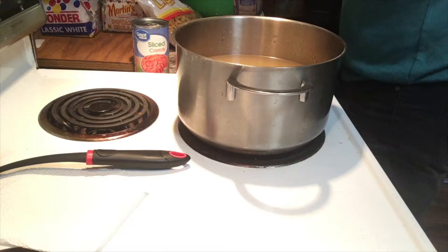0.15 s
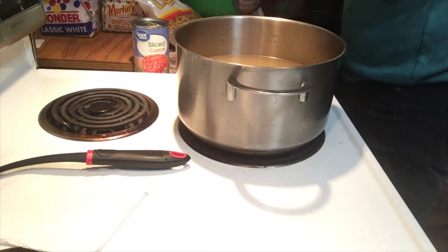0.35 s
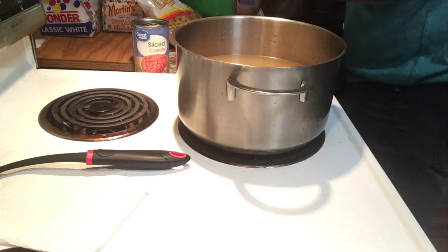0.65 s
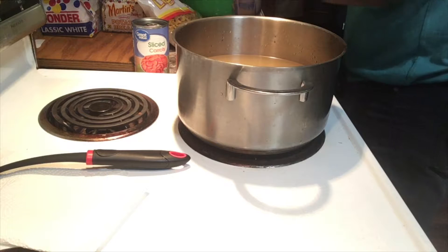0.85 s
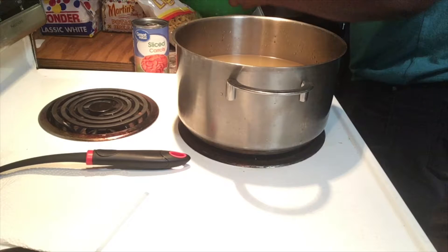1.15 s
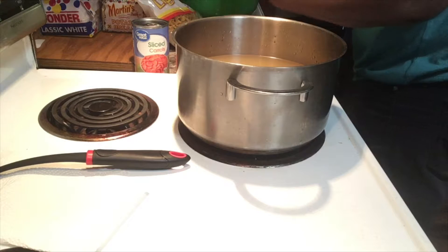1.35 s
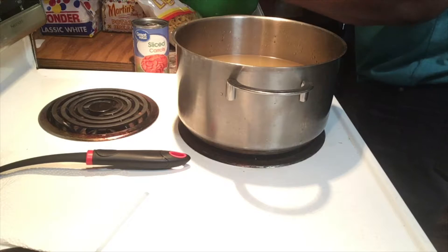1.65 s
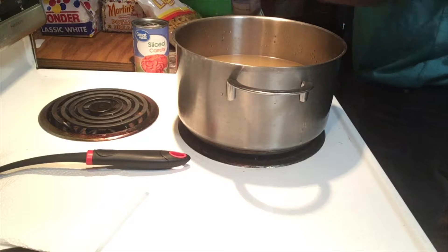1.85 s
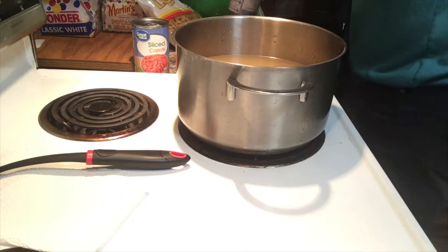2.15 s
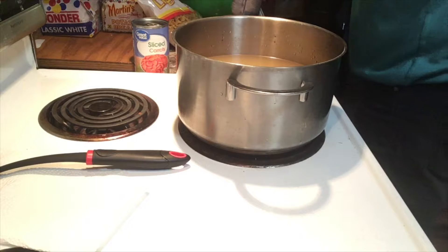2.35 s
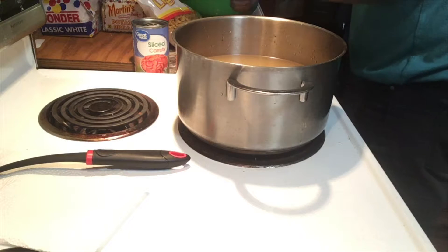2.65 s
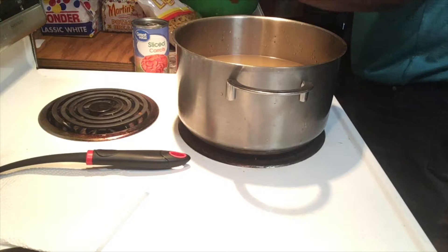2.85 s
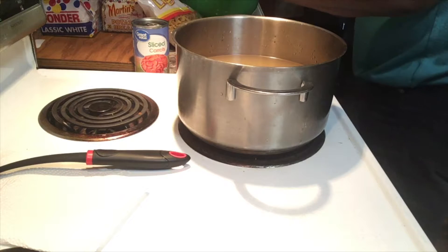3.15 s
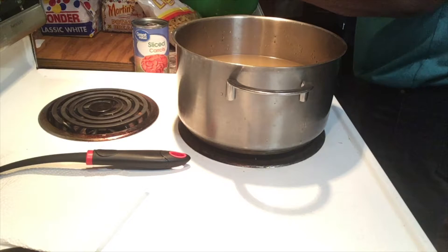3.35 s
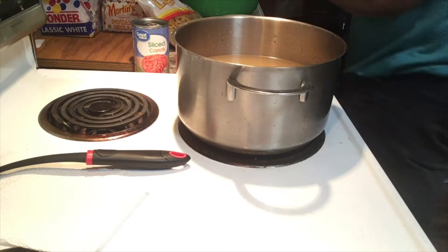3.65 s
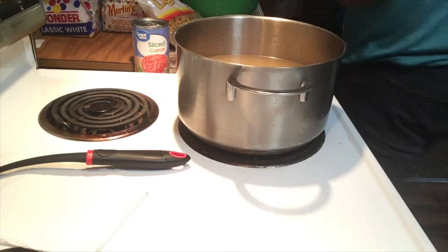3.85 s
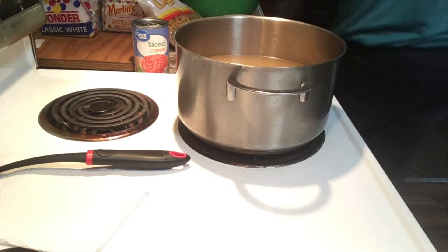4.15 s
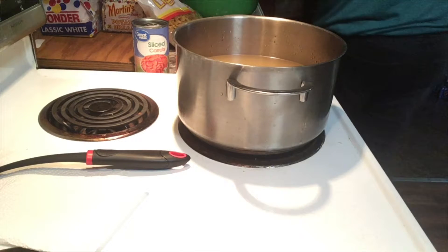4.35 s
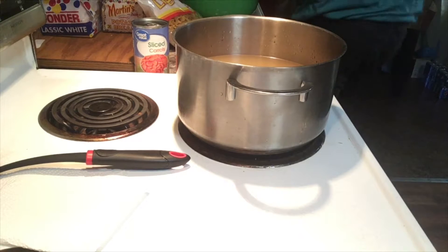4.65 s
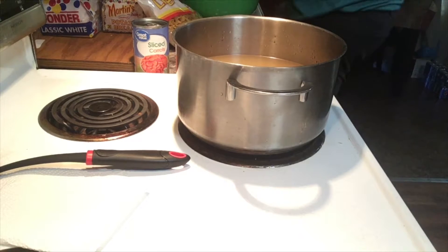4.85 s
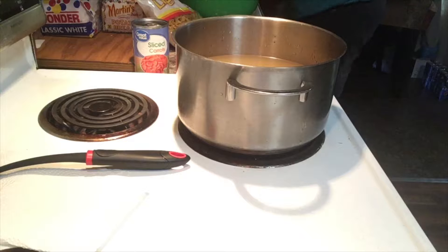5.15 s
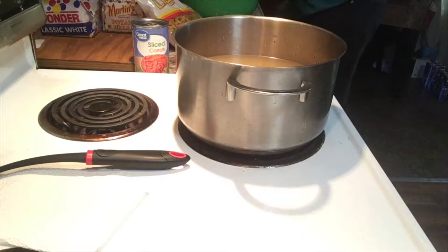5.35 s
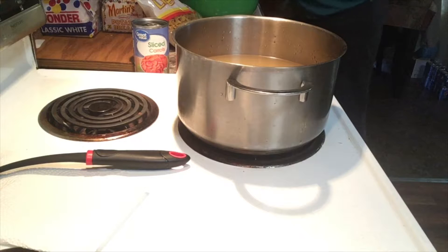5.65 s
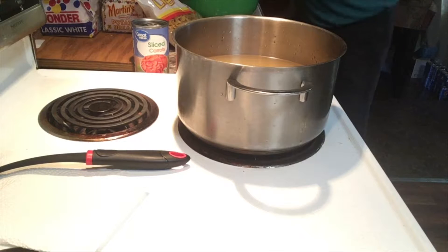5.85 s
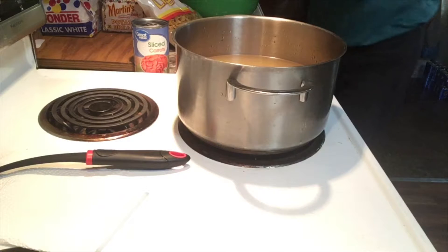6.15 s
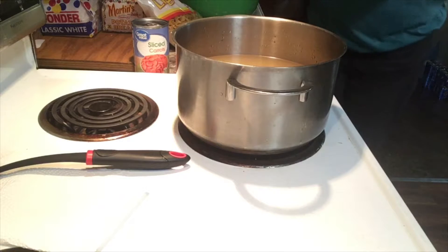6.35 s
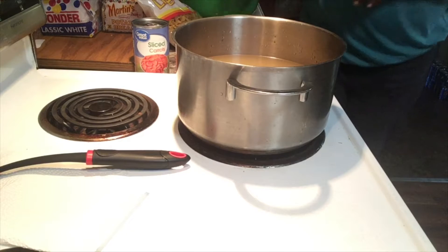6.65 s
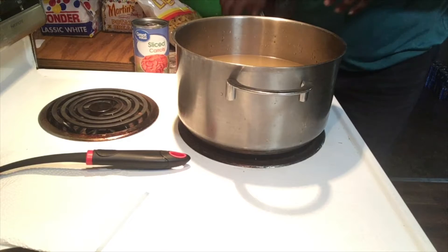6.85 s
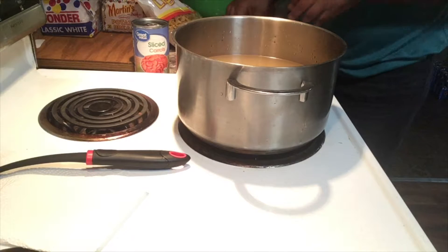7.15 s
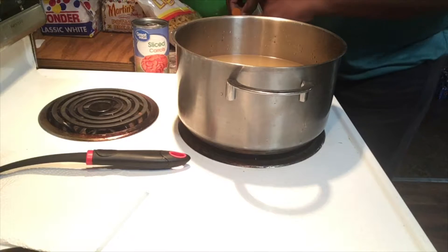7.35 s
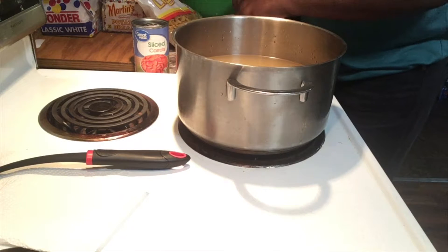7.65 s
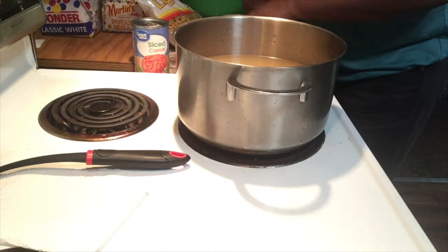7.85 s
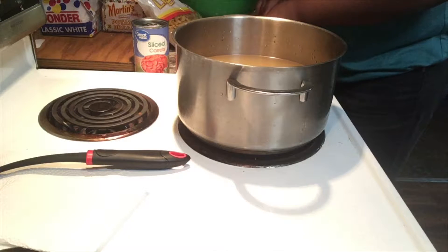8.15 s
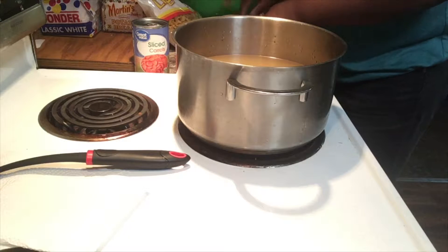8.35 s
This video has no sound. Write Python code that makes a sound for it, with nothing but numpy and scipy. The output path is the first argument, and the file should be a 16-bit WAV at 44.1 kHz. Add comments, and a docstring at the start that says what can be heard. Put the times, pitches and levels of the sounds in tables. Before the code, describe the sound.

A quiet small kitchen with low room rumble, faint hum and short echo. From 0 to 1.3 seconds a hand can opener gives faint, irregular metallic ticks, with barely audible footfalls. At 1.4 a sharp snap of the rim, then more sparse ticks until about 3.1. At 3.55 a dull wooden knock, followed from 3.7 to 3.9 by quick bright cracks and a ringing lid. Loud hollow tin clanks come at 4.03 and 4.2, with smaller rattles, choked as a hand grips the can around 4.4. At 4.6 a solid wooden knock with a heavy footfall and cloth brushing. Around 5.75 the can tumbles into a bin: boomy thuds, then tins clattering and plastic crinkling until 6.3. Soft steps and light knocks at 6.55 and 7.15, isolated ticks near 6.5 to 6.75, faint squeaks at 7 and 8, and very quiet ticks to the end at 8.5.

```python
"""A hand can opener ticks round a tin can: each slipping gear tooth kicks damped modes and a noise burst.
The cutter snaps through the rim as decaying noise and a ringing lid; the can's end plate and wall clank
as sums of modes. A bin and its tins answer with dull thuds, clatter and a crinkling bag. Footfalls, knocks
and clothes are coloured noise, the crank squeaks as a few swelling partials, and a small kitchen adds
a short echo over faint hum and room noise."""
import sys
import numpy as np
from scipy import signal
from scipy.fft import rfft, irfft, next_fast_len
from scipy.io import wavfile
from scipy.ndimage import map_coordinates

SR = 44100
rng = np.random.default_rng(int(sys.argv[2]) if len(sys.argv) > 2 else 0)


def store_pcm(level_fs):
    """Save levels as 16-bit WAV."""
    pcm = np.round(np.clip(level_fs, -1, 1) * 32767).astype(np.int16)
    wavfile.write(sys.argv[1], SR, np.atleast_2d(pcm).T)


N = 374850
AGE = np.arange(SR * 3 // 4) / SR  # time since a blow [s]
FIRST = SR // 40  # 25 ms [samples]

# "Nominal" levels and decay times are trimmed or scaled where the sound is played.
# Levels of blows refer to the rms of their first 25 ms.


def amp(db):
    """Logarithmic level: decibels to linear gain."""
    return 10 ** (np.asarray(db) / 20)


def unit(x):
    """Normalisation by mean power: scale to rms 1."""
    return x / np.sqrt(np.mean(x ** 2) + 1e-20)


def struck(x):
    """Normalisation by onset power: the first 25 ms of a blow get rms 1."""
    return x / np.sqrt(np.mean(x[:FIRST] ** 2) + 1e-20)


def along(points, hz):
    """Logarithmic frequency scale: interpolate (frequency, value) points on it."""
    f, v = np.transpose(points)
    return np.interp(np.log(hz + 1), np.log(np.sort(f) + 1), v)


def fade(t60, t=AGE):
    """Exponential decay: amplitude falls 60 dB in t60 seconds."""
    return np.exp(-np.log(1000) * t / np.maximum(t60, 1e-3))


def wobble(rate, size):
    """Band-limited fluctuation: a smooth random curve with rate knots a second."""
    knots = rng.standard_normal(int(size * rate / SR) + 4)
    smooth = map_coordinates(knots, [np.arange(8 * len(knots)) / 8], mode="nearest")
    return np.interp(np.arange(size) * 8 * rate / SR, np.arange(len(smooth)), smooth)


def colour(x, points):
    """Minimum-phase filtering: the folded cepstrum makes the given response causal."""
    size = 2 * next_fast_len(len(x) // 2 + 4096)
    level_db = along(points, np.fft.rfftfreq(size, 1 / SR))
    cepstrum = irfft(np.log(amp(level_db) + 1e-6))
    cepstrum[1:size // 2] *= 2
    cepstrum[size // 2 + 1:] = 0
    response = np.exp(rfft(cepstrum))
    return irfft(rfft(x, size) * response)[:len(x)]


def add(track, s, sound):
    """Superposition: mix a sound in at time s."""
    start = max(round(s * SR), 0)
    track[start:start + len(sound)] += sound[:max(N - start, 0)]


def crowd(size, ripple_db):
    """High modal density: noise with random spectral ripple, knots 60 Hz apart, deeper in the treble."""
    hz = np.fft.rfftfreq(size, 1 / SR)
    knots = np.arange(0, SR, 60)
    ripple = np.interp(hz, knots, rng.standard_normal(len(knots)))
    depth = ripple_db * hz / (hz + 3000)
    return irfft(rfft(rng.standard_normal(size)) * amp(depth * ripple), size)


def burst(spectrum, t60, crack, rise=0.00144):
    """Impact excitation: a sharp crack over a crowd of quickly dying resonances."""
    shape = (fade(t60) + crack * fade(0.0059)) * (1 - fade(rise))
    grain = crowd(len(AGE), ripple_db=7)
    return struck(colour(grain * shape, spectrum))


def ring(modes, length, waver, buzz, pitch=1):
    """Modal superposition: damped sines, their phase blurred by grip and roughened by loose contact."""
    out = np.zeros(len(AGE))
    for k, (hz, db, t60) in enumerate(modes):
        strength = (-1) ** k * amp(db + rng.uniform(-1.5, 1.5))
        blur = waver * np.sqrt(hz / 1000) * wobble(70, size=len(AGE))
        phase = 2 * np.pi * hz * pitch * AGE + blur
        rough = 1 + buzz * np.sqrt(hz / 2000) * wobble(350, size=len(AGE))
        out += strength * fade(t60 * length) * rough * np.sin(phase)
    return struck(out * (1 - fade(.004)))


def stroke(s, length, rise, t60):
    """Gesture envelope: a linear rise from time s, a hold until s + length, exponential decay."""
    t = np.arange(N) / SR - s
    return np.clip(t / rise, 0, 1) * fade(t60, np.maximum(t - length, 0))


def rustle(spectrum, grain_db, rate):
    """Friction noise: random level swings gather it into small clumps."""
    clumps = amp(grain_db * wobble(rate, size=N))
    return unit(colour(rng.standard_normal(N) * clumps, spectrum))


def chatter(spectrum, rate, t60):
    """Random micro-impacts: contacts of uneven size, on average rate a second."""
    hits = (rng.random(N) < rate / SR) * rng.uniform(0.2, 1, N)
    shape = signal.fftconvolve(hits, fade(t60))[:N]
    grain = crowd(N, ripple_db=7)
    return unit(colour(grain * shape, spectrum))


# Room noise spectrum: (frequency [Hz], relative level [dB])
AIR_SPECTRUM = [(25, -12), (45, 0.5), (75, -6), (115, -9), (160, -12.5), (300, -21.5), (600, -24),
                (1150, -25.5), (1900, -32), (3000, -33), (4800, -38.5), (7700, -38.5), (12000, -43.5),
                (15800, -47)]
# Appliance hum partials: (frequency [Hz], level [dB])
HUM_PARTIALS = [(120, -72.5), (1125, -81), (1243, -87)]
AIR_DB = -61.5


def background():
    """Stationary noise and phase-modulated tones: room rumble, hiss and a faintly unsteady hum."""
    t = np.arange(N) / SR
    hum = np.zeros(N)
    for hz, db in HUM_PARTIALS:
        hum += amp(db) * unit(np.sin(2 * np.pi * hz * t + 0.42 * wobble(11, size=N)))
    return hum + amp(AIR_DB) * rustle(AIR_SPECTRUM, grain_db=0.9, rate=9.0)


# Opener ticks, mostly the gear slipping a tooth, the one at 5.3 s a rattle in the hand: (time [s], nominal
# level [dB])
OPENER_TICKS = [(0.0714, -54), (0.2357, -53.5), (0.404, -51.5), (0.554, -54), (0.8221, -55), (1.863, -51),
                (1.952, -59.5), (2.129, -51.5), (2.262, -53.5), (2.7199, -47.5), (3.0952, -51),
                (5.3012, -55), (6.4998, -50), (6.7131, -52), (6.754, -48.5), (7.453, -58), (7.723, -62.5),
                (8.0581, -60.5), (8.4007, -58.5)]
# Spells of handling, the grip setting the brightness: (start [s], end [s], nominal edge re tick [dB])
HANDLING_SPELLS = [(0, 1.3, -17), (1.6, 3.302, -13), (5.2, 6.802, -14), (7.391, 8.504, -6.5)]
# Faint teeth that mesh in between: rate [1/s], nominal level [dB], half-range about it [dB]
FAINT_TICKS_PER_S, FAINT_TICK_DB, FAINT_SPREAD_DB = 2.3, -63, 5.5


def tick_schedule():
    """Intermittent meshing: listed ticks and random faint teeth, as (time, level, edge)."""
    ticks = []
    for start, end, edge_db in HANDLING_SPELLS:
        ticks += [(s, db, edge_db) for s, db in OPENER_TICKS if start <= s < end]
        for when, size in rng.random((int((end - start) * FAINT_TICKS_PER_S), 2)):
            level_db = FAINT_TICK_DB + FAINT_SPREAD_DB * (2 * size - 1)
            ticks.append((start + when * (end - start), level_db, edge_db))
    return ticks


# Gear modes: (frequency [Hz], mean relative level [dB], t60 [s])
GEAR_MODES = [(1017, -0.5, 0.057), (1190, -7.5, .05), (1574, -3, 0.061), (1690, -10.5, 0.045),
              (2060, -5.5, 0.058), (2320, -21, 0.034), (2390, -2.5, 0.066), (2510, 1.5, 0.057),
              (2760, -8, 0.045), (3310, -8, 0.036)]
# Bright contact spectrum of cutter and gear: (frequency [Hz], relative level [dB])
CUTTING_SPECTRUM = [(200, -26.5), (450, 8), (1000, 3.5), (1800, 1.5), (2400, 0.5), (3400, -1.5), (4500, -4),
                    (7000, -0.5), (9500, -6.5), (12500, -3.5), (15500, -16)]


def gear_ticks():
    """Impulsive modal excitation: each tooth rings the gear and adds a bright noise edge."""
    out = np.zeros(N)
    for s, db, edge_db in tick_schedule():
        add(out, s, amp(db - 10) * ring(GEAR_MODES, length=1.0, waver=0.98, buzz=0.54))
        edge = burst(CUTTING_SPECTRUM, t60=0.079, crack=0.6, rise=0.0056)
        add(out, s, amp(db + edge_db - 4.5) * edge)
    return out


# Footfalls: (heel time [s], nominal level [dB])
FOOTFALLS = [(0.076, -53), (0.19, -53.5), (0.575, -49), (3.561, -45.5), (4.405, -44.5), (4.474, -41.5),
             (4.618, -30.5), (4.99, -50), (5.09, -47), (5.18, -53), (5.271, -55.5), (6.55, -38.5),
             (7.143, -37.5), (7.19, -36.5), (7.674, -52.5)]
# Floorboard spectrum: (frequency [Hz], relative level [dB])
FLOOR_SPECTRUM = [(30, -30), (60, -4.5), (85, -10), (125, 6), (155, -1.5), (210, -13.5), (350, -23),
                  (900, -61)]
HEEL_DB, HEEL_T60_S = -1.5, 0.1  # re nominal level
SOLE_DB, SOLE_T60_S, SOLE_LAG_S = -5.0, 0.13, 0.0261  # the sole comes down after the heel


def footsteps():
    """Soft impact: heel then sole excite the floor with gradual, low-pitched noise bursts."""
    out = np.zeros(N)
    for s, db in FOOTFALLS:
        heel = burst(FLOOR_SPECTRUM, HEEL_T60_S, crack=0, rise=0.014)
        sole = burst(FLOOR_SPECTRUM, SOLE_T60_S, crack=0, rise=0.017)
        add(out, s, amp(db + HEEL_DB) * heel)
        add(out, s + SOLE_LAG_S, amp(db + SOLE_DB) * sole)
    return out


# Knocks on counter and cupboard: (time [s], nominal level [dB], t60 [s])
WOOD_KNOCKS = [(0.196, -63, 0.12), (0.604, -64, 0.12), (3.550, -33, 0.18), (3.577, -40.5, 0.091),
               (4.616, -27, 0.13), (4.718, -54.5, 0.13), (5.069, -57, .3), (6.548, -59, 0.089),
               (6.804, -46.5, 0.22), (7.140, -48, 0.16), (7.203, -50.5, 0.13)]
# Wood spectrum: (frequency [Hz], relative level [dB])
WOOD_SPECTRUM = [(41, -35), (70, -21.5), (100, -8.5), (136, -2), (242, -16), (309, -5), (461, -13.5),
                 (562, -6.5), (937, -12.5), (1340, -18), (2270, -28.5), (2600, -33), (2900, -32.5),
                 (14000, -64)]


def knocks():
    """Heavily damped impact: wood answers with short, dull bursts."""
    out = np.zeros(N)
    for s, db, t60 in WOOD_KNOCKS:
        add(out, s, amp(db - 1.0) * burst(WOOD_SPECTRUM, t60, crack=0.46, rise=.005))
    return out


GRIP_S, GRIP_T60_S = 4.365, .45  # the hand closes on the can


def grip():
    """Added damping: a gain that is 1 until the hand closes, then decays."""
    return fade(GRIP_T60_S, np.maximum(np.arange(N) / SR - GRIP_S, 0))


# Can end popping in and out: (time [s], level before grip [dB], pitch [Hz], nominal t60 [s])
END_FLEXES = [(0.44, -69, 440, 0.3), (1.552, -58, 441, .25), (2.165, -56, 438.6, 0.37),
              (3.695, -46.5, 444, 0.78), (3.79, -46, 430, 0.95), (3.904, -63, 428, .5),
              (3.95, -47.5, 435.6, 0.38)]


def end_flexes():
    """Snap-through buckling: the strained end plate pops and rings in one mode."""
    out = np.zeros(N)
    for s, db, hz, t60 in END_FLEXES:
        add(out, s, amp(db) * ring([(hz, 0, t60)], length=0.88, waver=.25, buzz=0.17))
    return out * grip()


# Cutter snapping through the rim: (time [s], nominal crack level [dB], crack t60 [s], lid level [dB])
RIM_SNAPS = [(1.437, -36, 0.083, -67), (2.167, -61.5, 0.04, -82), (3.688, -33, 0.067, -31.5),
             (3.708, -35, 0.1, -50.5), (3.782, -40, 0.067, -42), (3.80, -48.5, 0.072, -43),
             (3.902, -37.5, 0.12, -46.5), (4.152, -41.5, 0.11, -43), (4.513, -47.5, 0.071, -63)]
# Lid modes: (frequency [Hz], mean relative level [dB], nominal t60 [s])
LID_MODES = [(860.4, -13.5, 0.69), (1143, -14, 0.14), (1278, -5.5, 0.27), (1620, -7, 0.17),
             (2236, 4.5, 0.077), (2190, -6, 0.067), (2520, -2.5, 0.21), (2495, -3.5, 0.28),
             (2656, -4.5, 0.059), (3070, -11, 0.34), (3434, -6.5, 0.093), (3365, -8, 0.23),
             (4230, -10, 0.13), (4450, -29, 0.13)]


def rim_snaps():
    """Sudden release of strain: a crack of noise and the freed lid's modes."""
    out = np.zeros(N)
    for s, db, t60, lid_db in RIM_SNAPS:
        add(out, s, amp(db - 6.5) * burst(CUTTING_SPECTRUM, t60, crack=1.25, rise=0.0032))
        add(out, s, amp(lid_db) * ring(LID_MODES, length=0.35, waver=.45, buzz=0.89))
    return out


# Brushing of clothes and soles: (time [s], length [s], hiss level [dB], rub level [dB])
BRUSHES = [(3.442, 0.3, -72.5, -64.5), (4.413, 0.14, -61.5, -55.5), (4.572, 0.024, -63.5, -45.5),
           (4.974, 0.062, -64, -65), (5.086, 0.14, -89, -69.5), (5.258, 0.042, -66.5, -63),
           (6.544, .11, -60.5, -58), (6.792, 0.12, -70, -59.5), (6.95, 0.25, -79, -75),
           (7.127, .065, -62.5, -61.5)]
# Treble part of the brushing: (frequency [Hz], relative level [dB])
HISS_SPECTRUM = [(1500, -19), (3000, 7.5), (6500, 3.5), (10000, -0.5), (15500, -13)]
# Lower part of the brushing: (frequency [Hz], relative level [dB])
RUB_SPECTRUM = [(250, -12), (600, 6.5), (1400, 5), (2600, 2.5), (4500, -20)]
SWISH_RISE_S, SWISH_T60_S = 0.037, 0.58


def swishes():
    """Sliding friction: two bands of clumped noise swell with each move."""
    out = np.zeros(N)
    hiss = rustle(HISS_SPECTRUM, grain_db=1, rate=350)
    rub = rustle(RUB_SPECTRUM, grain_db=0.5, rate=180)
    for s, length, hiss_db, rub_db in BRUSHES:
        move = stroke(s, length, SWISH_RISE_S, SWISH_T60_S)
        out += move * (amp(hiss_db) * hiss + amp(rub_db) * rub)
    return out


# Ringing of the opener's arms: (time [s], level [dB])
ARM_CHINKS = [(3.787, -50), (3.903, -41)]
# Steel arm modes: (frequency [Hz], mean relative level [dB], nominal t60 [s])
ARM_MODES = [(1890, 4.5, 0.36), (3220, -6, 0.34), (4907, -3.5, .2), (5980, 2, 0.35), (6330, -20, .3),
             (6790, -3, 0.21), (7830, -4.5, .3), (8660, -7, .35), (9300, -1.5, 0.23), (11300, -13, .25),
             (12000, -4, 0.22)]


def arm_chinks():
    """Bar vibration: the steel arms ring in bright modes."""
    out = np.zeros(N)
    for s, db in ARM_CHINKS:
        add(out, s, amp(db) * ring(ARM_MODES, length=0.79, waver=0.17, buzz=0.39))
    return out


# Blows on the can: (time [s], end-plate level before grip [dB], wall level [dB], contact level [dB],
# share of the full ring length [ratio], end-plate pitch under the grip [ratio])
CAN_BLOWS = [(3.96, -46.5, -46.5, -47.5, 0.53, 0.96), (4.033, -19, -29, -29.5, 0.18, 0.99),
             (4.043, -27.5, -49, -46, 0.22, .97), (4.066, -42, -38.5, -52.5, 0.48, .94),
             (4.111, -46, -53, -44.5, 0.64, 0.91), (4.194, -21, -27, -36.5, 0.82, 0.99),
             (4.284, -31.5, -36.5, -46, 0.41, 1), (4.314, -42, -35.5, -41.5, 0.81, 0.97),
             (4.374, -48, -41.5, -54, .8, 0.93)]
# End-plate modes: (nominal frequency [Hz], mean relative level [dB], nominal t60 [s])
END_MODES = [(405, -12, .3), (436.4, -2, 1), (521, -2, 0.249), (570, 0, 0.64), (606.6, -5.5, 0.5),
             (642, -8.5, 0.65), (862, -18.5, 1)]
# Can wall modes: (frequency [Hz], mean relative level [dB], nominal t60 [s])
WALL_MODES = [(1292, 3, 0.48), (1270, -6.5, 0.22), (1714, -7, 0.33), (1757, -5.5, 0.38), (1980, -12, 0.7),
              (1990, -9.5, 0.13), (2220, -18, 0.14), (2430, -9, 0.39), (2490, -18.5, 0.62),
              (3000, -17.5, 0.3), (3280, -18, 0.29), (3600, -17.5, 0.55), (3990, -20.5, .3),
              (4590, -25, .25), (4500, -22, 0.38), (5400, -17, 0.4)]
# Metal contact spectrum: (frequency [Hz], relative level [dB])
CONTACT_SPECTRUM = [(250, -20.5), (500, 0.5), (950, 1.5), (2100, 10), (2900, -3.5), (4400, -4),
                    (5000, -7.5), (6500, -4.5), (9000, -9), (10200, -18), (11400, -10.5), (15500, -23.5)]


def can_clanks():
    """Plate and shell vibration: end and wall ring, and a bright contact marks each blow."""
    contact, end, wall = np.zeros(N), np.zeros(N), np.zeros(N)
    for s, end_db, wall_db, contact_db, length, pitch in CAN_BLOWS:
        add(contact, s, amp(contact_db) * burst(CONTACT_SPECTRUM, t60=0.19, crack=0.93))
        add(end, s, amp(end_db) * ring(END_MODES, length, waver=0.18, buzz=.18, pitch=pitch))
        add(wall, s, amp(wall_db) * ring(WALL_MODES, length, waver=0.53, buzz=0.21))
    return contact, end * grip() + wall


CHATTER_DB, CHATTER_RISE_S, CHATTER_T60_S = -10.5, .008, 0.62  # level re wall, before grip


def edge_chatter():
    """Repeated micro-impact: the cut edge chatters on the opener after each blow until gripped."""
    power = np.zeros(N)
    for s, _, wall_db, *_ in CAN_BLOWS:
        power += (amp(wall_db) * stroke(s, 0, CHATTER_RISE_S, CHATTER_T60_S)) ** 2
    shaking = amp(CHATTER_DB) * np.sqrt(power) * grip()
    return shaking * chatter(CONTACT_SPECTRUM, rate=220, t60=0.035)


# Can dragging the bin bag down: (time [s], length [s], level [dB])
BAG_CRUMPLES = [(5.728, .05, -38.5), (5.894, .09, -62), (5.98, 0.043, -35)]
# Plastic film spectrum: (frequency [Hz], relative level [dB])
PLASTIC_SPECTRUM = [(1200, -2.5), (2500, -8.5), (3600, -1.5), (4800, -18), (6000, -5), (7500, -14),
                    (9000, -16.5), (12500, -20.5), (15500, -27)]
CRUMPLE_RISE_S, CRUMPLE_T60_S = 0.024, 0.35


def bag_crumples():
    """Crackling noise: the creasing film gives many tiny random clicks."""
    drag = np.zeros(N)
    for s, length, db in BAG_CRUMPLES:
        drag += amp(db) * stroke(s, length, CRUMPLE_RISE_S, CRUMPLE_T60_S)
    return drag * chatter(PLASTIC_SPECTRUM, rate=420, t60=0.044)


# Can tumbling into the bin: (time [s], nominal level [dB], thud t60 [s])
BIN_TUMBLES = [(5.736, -34, 0.255), (5.747, -22.5, 0.21), (5.766, -19.5, .16), (5.805, -24, 0.12),
               (5.814, -30, 0.33), (5.89, -32, .36), (5.93, -36.5, 0.27), (5.968, -33, 0.21),
               (6.1, -45, 0.084)]
# Bin thud spectrum: (frequency [Hz], relative level [dB])
BIN_SPECTRUM = [(24, -34.5), (40, -11), (263, -4), (541, -8.5), (582, -13), (1030, -11.5), (1730, -22),
                (2390, -19.5), (2990, -29), (3390, -27), (15000, -50.5)]
# Bin wall modes: (frequency [Hz], mean relative level [dB], nominal t60 [s])
BIN_MODES = [(88, -1.5, 0.11), (143.5, 1.5, 0.44), (192, -8, 0.117), (218.6, -1, .22), (247, 5, .2),
             (278.7, -0.5, 0.18), (341, -2, 0.4), (397.7, -3, 0.3), (482, -10.5, 0.41), (529, 1, 0.17)]
BOOM_DB = -2  # the bin's walls, re nominal level


def bin_tumbles():
    """Panel vibration: a dull thud and the bin walls' low modes at each blow."""
    out = np.zeros(N)
    for s, db, t60 in BIN_TUMBLES:
        add(out, s, amp(db - 1.5) * burst(BIN_SPECTRUM, t60, crack=0.55, rise=.005))
        add(out, s, amp(db + BOOM_DB) * ring(BIN_MODES, length=0.65, waver=0.61, buzz=0.9))
    return out


# Landing among other tins: (time [s], nominal ring level [dB], contact level [dB])
TIN_BLOWS = [(5.775, -42, -37.5), (5.808, -37.5, -52), (5.929, -40, -61.5), (5.970, -35.5, -53.5),
             (5.993, -30.5, -36), (6.030, -28.5, -40), (6.086, -33.5, -46), (6.125, -44, -52),
             (6.250, -64, -68), (6.296, -63, -65)]
# Modes of the tins: (frequency [Hz], mean relative level [dB], nominal t60 [s])
TIN_MODES = [(356, -12, 0.23), (437.8, -1, 0.25), (624, -7.5, 0.36), (647.3, -6, 0.34), (718, -16, 0.53),
             (1212, -14.5, 0.56), (1270, 1.5, 0.17), (1746, -8.5, 0.19), (1860, 0, 0.47), (1980, -5, 0.33),
             (2300, -30, .25), (2453, -1, 0.19), (2590, -20.5, 0.16), (3140, -18, 0.35), (3450, -18, 0.31),
             (3640, -13, 0.47), (4080, -23.5, .3), (5630, -12, 0.22), (6980, -23.5, 0.36),
             (7260, -18.5, 0.22)]
# Tin on tin contact spectrum: (frequency [Hz], relative level [dB])
TIN_SPECTRUM = [(300, -8.5), (900, 2), (1500, 3), (2500, 0), (3000, -9), (3700, -7.5), (4800, -7),
                (5900, -5.5), (7600, -6), (8800, -15), (12000, -21), (15500, -28)]


def tin_clatter():
    """Shell vibration by collision: tins ring and clack at each blow."""
    contact, rings = np.zeros(N), np.zeros(N)
    for s, ring_db, contact_db in TIN_BLOWS:
        add(contact, s, amp(contact_db) * burst(TIN_SPECTRUM, t60=0.39, crack=2))
        add(rings, s, amp(ring_db - 1.5) * ring(TIN_MODES, length=0.98, waver=0.6, buzz=0.31))
    return contact, rings


# Faint crank squeaks: (time [s], level before the swell [dB], length [s])
CRANK_SQUEAKS = [(7, -68, 0.13), (7.991, -69, 0.083)]
# Crank bending modes: (frequency [Hz], mean relative level [dB])
CRANK_MODES = [(2920, -4), (5255, -7), (8055, -8), (11332, -16), (15084, -17)]


def squeaks():
    """Friction-driven vibration: the crank's bending modes swell and fade."""
    out = np.zeros(N)
    for s, db, length in CRANK_SQUEAKS:
        swell = np.sin(np.pi * np.minimum(AGE / length, 1)) ** 2
        tone = np.zeros(len(AGE))
        for hz, level_db in CRANK_MODES:
            phase = 2 * np.pi * hz * AGE + 1.0 * wobble(150, size=len(AGE))
            tone += amp(level_db + rng.normal()) * np.sin(phase)
        add(out, s, amp(db) * swell * unit(tone))
    return out


# Kitchen reverberation: (frequency [Hz], t60 [s])
KITCHEN_DECAY = [(100, 0.19), (500, 0.41), (2000, 0.41), (7000, 0.33), (15000, 0.12)]


def room(x):
    """Diffuse reverberation: convolution with noise whose decay time depends on frequency."""
    hz, t, z = signal.stft(rng.standard_normal(len(AGE)), SR, nperseg=256)
    decay = fade(along(KITCHEN_DECAY, hz)[:, None], t)
    tail = signal.istft(z * decay, SR, nperseg=256)[1]
    tail = np.concatenate([np.zeros(round(.004 * SR)), tail])  # 4 ms before the echo
    return signal.fftconvolve(x, tail / np.linalg.norm(tail))[:N]


def scene():
    """Superposition of direct and reverberant sound: blows echo, while friction and hum stay dry."""
    air, ticks, steps, wood = background(), gear_ticks(), footsteps(), knocks()
    flexes, snaps, brushing, chinks = end_flexes(), rim_snaps(), swishes(), arm_chinks()
    can_contact, can_ring = can_clanks()
    rustling = brushing + edge_chatter() + bag_crumples()
    dull = steps + wood + bin_tumbles()
    tin_contact, tin_ring = tin_clatter()
    bright = ticks + snaps + chinks + can_contact + tin_contact
    tin = flexes + can_ring + tin_ring
    echo = room(amp(-6.5) * bright + amp(-11.5) * tin + amp(-8.0) * dull)
    return (bright + tin + dull + echo + squeaks() + rustling + air)[None]


TOP_HZ = 15850  # upper band limit


def record(dry):
    """Band limitation: a high-pass rolls off deep bass and a spectral cut removes the top."""
    size = next_fast_len(N + SR)
    high_pass = signal.butter(4, 36, "highpass", fs=SR, output="sos")
    thinned = signal.sosfilt(high_pass, dry)
    kept = np.fft.rfftfreq(size, 1 / SR) < TOP_HZ
    return irfft(rfft(thinned, size) * kept, size)[:, :N]


dry = scene()
out = record(dry)
store_pcm(out)
```